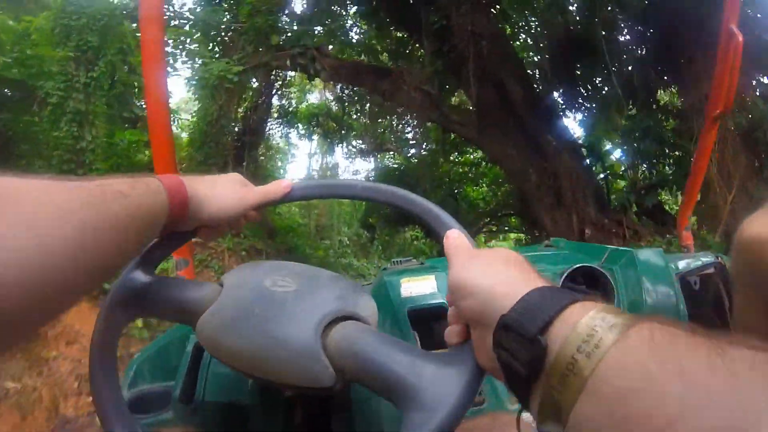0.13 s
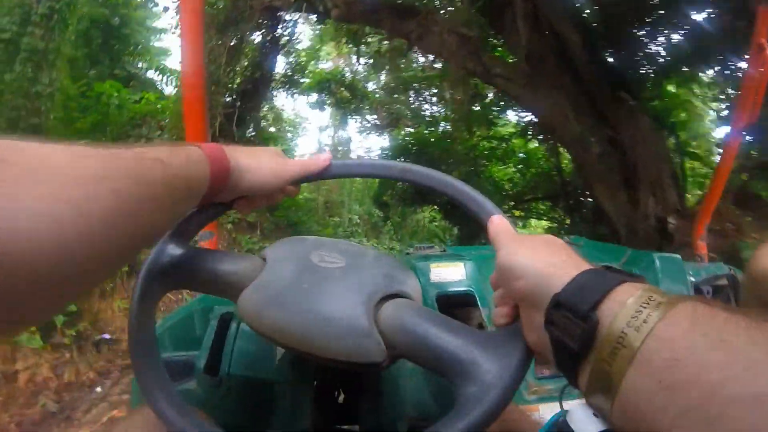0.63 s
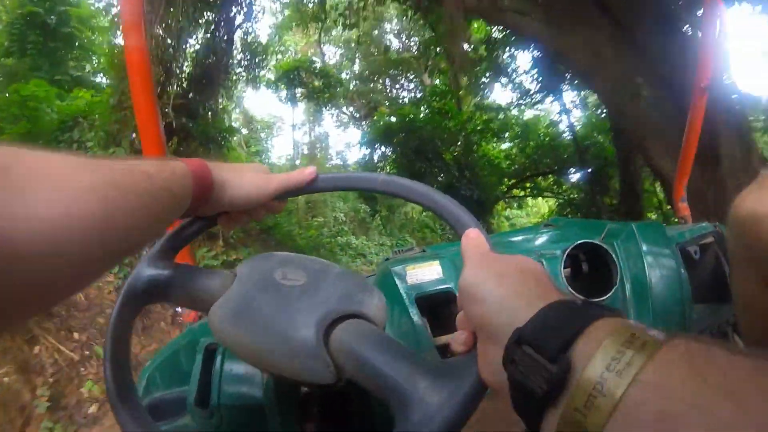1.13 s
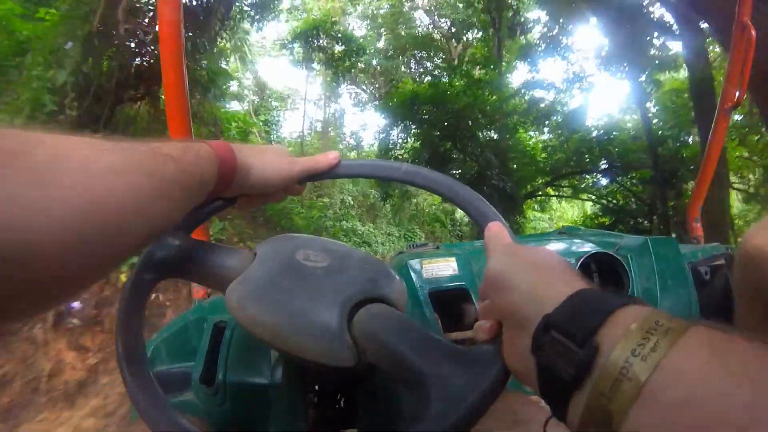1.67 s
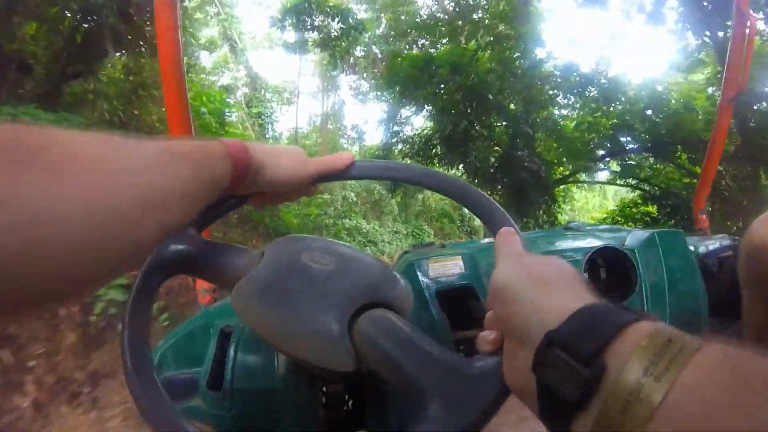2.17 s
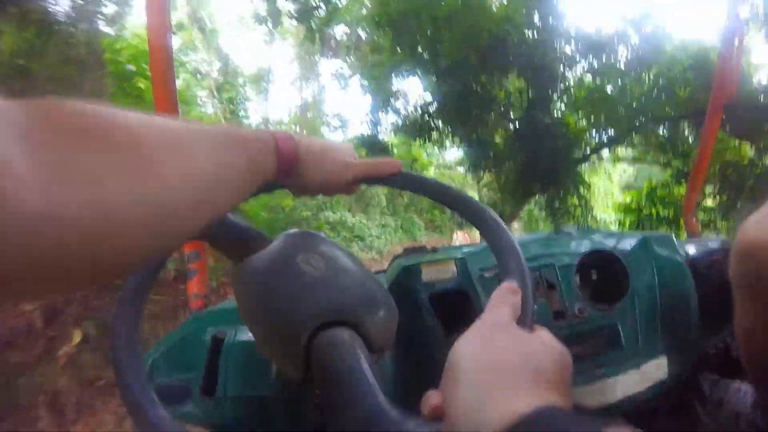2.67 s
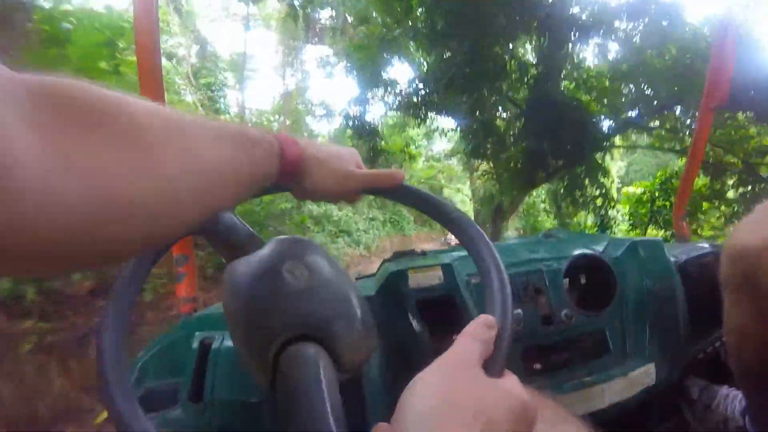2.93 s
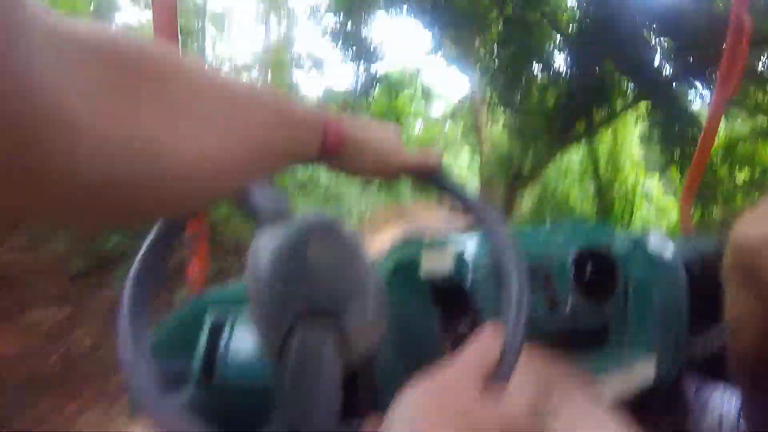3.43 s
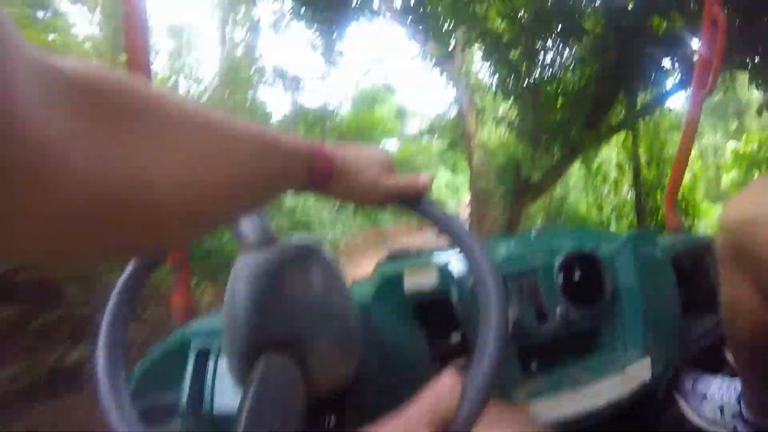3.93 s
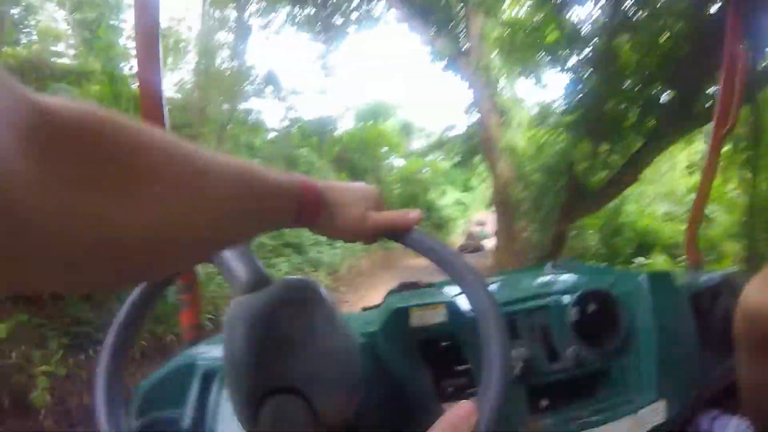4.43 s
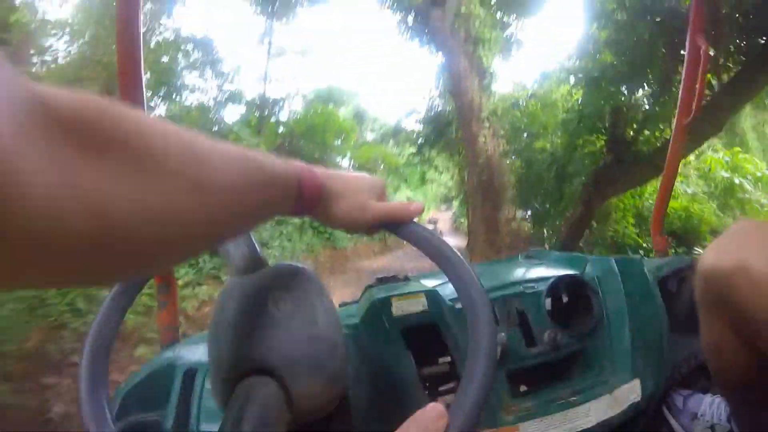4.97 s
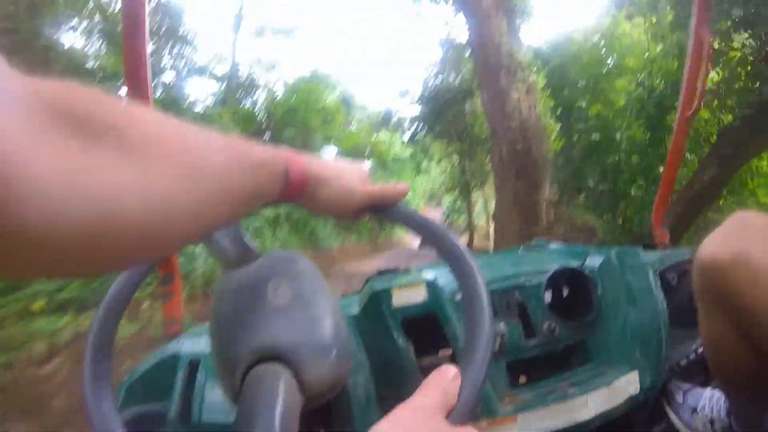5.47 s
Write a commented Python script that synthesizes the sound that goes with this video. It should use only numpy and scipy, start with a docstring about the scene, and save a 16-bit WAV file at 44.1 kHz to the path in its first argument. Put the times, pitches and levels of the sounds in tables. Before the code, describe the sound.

Inside a small open buggy on a rough forest track, a one-cylinder engine drones deep and boomy, climbs slightly, then drops abruptly around the middle to a slower, weaker, uneven chug. Low thumps jolt the microphone's case throughout, with short gritty scrapes from its mount, denser in the second half. A few hollow knocks of loose parts stand out after the drop. Close, muffled, body-worn microphone, outdoors with no echo.

```python
"""The one-cylinder engine of a small open buggy drones on a rough forest track and slows after a drop in revs.
Its drone is a stack of sine waves at multiples of the firing rate; its roar, growl and hiss are shaped noise.
A body-worn microphone in a muffling case hears it. Jolts thump the case as bursts of low noise, and its
mount scrapes as bursts of gritty noise. Loose parts knock as short rings, and a thin whistle is a sine wave.
"""
import sys
import numpy as np
from scipy import signal
from scipy.fft import rfft, irfft, next_fast_len
from scipy.io import wavfile
from scipy.ndimage import uniform_filter1d, map_coordinates

SR = 44100
rng = np.random.default_rng(int(sys.argv[2]) if len(sys.argv) > 2 else 0)


def file_out(sig):
    """Save sig as 16-bit WAV at sys.argv[1]."""
    # one column per channel
    cols = np.atleast_2d(sig).T
    # limit, then scale
    lim = np.clip(cols, -1, 1)
    pcm = np.round(lim * 32767).astype(np.int16)
    wavfile.write(sys.argv[1], SR, pcm)


def invert_db(x):
    """Field ratio 10**(x/20) for x, a level in decibels (scalar or array-like)."""
    u = np.asarray(x, float) / 20
    return 10 ** u


N = 246513  # length in samples


def along(points, hz):
    """Reads a curve of (Hz, value) points on a log frequency axis."""
    f, v = np.transpose(points)
    return np.interp(np.log(hz + 1), np.log(f + 1), v)


def curves(rows):
    """One value per sample for each column after the time."""
    s, *cols = np.transpose(rows)
    return [np.interp(np.arange(N) / SR, s, c) for c in cols]


def strokes(rows, rise_db_per_s, fall_db_per_s):
    """Gain of separate strokes: a steep rise, a sloping hold, a steep fall."""
    t = np.arange(N) / SR
    level_db = np.full(N, -120.)
    for s, held, start_db, end_db in rows:
        before_s = np.maximum(s - t, 0)
        after_s = np.maximum(t - s - held, 0)
        edge_db = rise_db_per_s * before_s + fall_db_per_s * after_s
        hold_db = np.interp(t, [s, s + held], [start_db, end_db])
        level_db = np.maximum(level_db, hold_db - edge_db)
    return invert_db(level_db)


def wobble(rate):
    """A smooth random curve through 'rate' random points a second."""
    points = rng.standard_normal(int(N * rate / SR) + 4)
    return map_coordinates(points, [np.arange(N) * rate / SR])


def coloured(x, spectrum, lo_hz, hi_hz):
    """Filters x through a spectrum, then scales it to rms 1 in the band lo-hi."""
    m = next_fast_len(N + 8192)
    hz = np.fft.rfftfreq(m, 1 / SR)
    z = rfft(x, m) * invert_db(along(spectrum, hz))
    band = irfft(z * ((hz > lo_hz) & (hz < hi_hz)), m)[:N]
    return irfft(z, m)[:N] / np.std(band)


# thin whistle: f/Hz, level/dB
WHISTLE_LINE = [(9651, -79)]


def whistle():
    """A thin sine line that wavers in level and phase."""
    (hz, db), = WHISTLE_LINE
    phase = 2 * np.pi * hz * np.arange(N) / SR + 1.1 * wobble(22)
    return invert_db(db + 2.1 * wobble(7.4)) * np.sin(phase)


# rings of knocking loose parts: t/s, level/dB (before the soft onset and decay), f/Hz, time to fall 60 dB/s
LOOSE_PARTS = [(1.08, -50, 6200, 0.081), (1.33, -53, 6210, 0.1), (1.4, -48, 6170, 0.1),
               (1.548, -51, 6200, 0.09), (2.07, -48, 6170, 0.15), (3.063, -16, 494, .05),
               (3.817, -27.5, 592, 0.092), (3.883, -35, 2300, 0.1), (3.887, -35, 1280, 0.1),
               (3.885, -34.5, 4500, 0.045), (3.99, -15.5, 428.5, 0.1), (4.735, -17.5, 1790, 0.045),
               (5.157, -40, 6236, 0.14)]


def knocks():
    """Each row is one short dying ring; the three near 3.885 s sound together as one knock."""
    out = np.zeros(N + SR)
    t = np.arange(SR // 4) / SR
    onset = 1 - np.exp(-t / 0.0036)
    for s, db, hz, t60 in LOOSE_PARTS:
        # the loose fit of the part roughens the ring: a random walk of the phase
        rattle = np.cumsum(rng.standard_normal(len(t))) * np.sqrt(hz) * 1.1e-3
        ring = np.sin(2 * np.pi * hz * t + rattle)
        out[round(s * SR):][:len(t)] += invert_db(db - 60 * t / t60) * onset * ring
    return out[:N]


# strokes of the scraping mount: start of full pressure t/s, held/s, level/dB at start, level/dB at end
MOUNT_STROKES = [(0.1, 0.019, -37.5, -40.5), (0.166, 0.12, -40.5, -38.5), (0.405, 0.07, -45, -46.5),
                 (0.51, 0.046, -48.5, -52.5), (0.583, 0.14, -49, -37.5), (0.68, .07, -45, -44),
                 (0.855, 0.1, -51, -54), (0.97, 0.087, -41.5, -51.5), (1.5, .07, -48.5, -50.5),
                 (1.845, 0.037, -50.5, -46.5), (1.935, .03, -54, -56), (2.035, 0.031, -54, -54.5),
                 (2.12, .025, -49, -53), (2.375, 0.012, -49, -44), (2.5, 0.075, -51, -41),
                 (2.575, 0.036, -41, -47.5), (2.66, 0.04, -46, -44.5), (3.064, .008, -51, -47),
                 (3.205, .03, -48, -52), (3.345, 0.054, -42, -44), (3.468, 0.034, -52, -35),
                 (3.535, 0.038, -43.5, -41.5), (3.605, 0.095, -39.5, -47.5), (3.77, 0.077, -48, -40.5),
                 (3.885, 0.033, -36.5, -52), (3.948, 0.023, -39, -33), (4.005, 0.074, -46, -48.5),
                 (4.135, .17, -49.5, -48.5), (4.326, 0.018, -34.5, -37), (4.41, 0.028, -46.5, -47.5),
                 (4.452, .02, -49, -46), (4.49, 0.033, -47.5, -34.5), (4.562, .03, -48, -53),
                 (4.6, 0.1, -46, -39), (4.733, 0.02, -37, -37.5), (4.795, 0.041, -40, -35.5),
                 (4.85, 0.077, -46, -54.5), (5.008, 0.044, -43, -47.5), (5.15, 0.029, -50, -49),
                 (5.225, 0.019, -45, -36), (5.26, 0.044, -38, -47), (5.316, 0.078, -46, -38.5)]
# colour of the rubbing, with the case's resonances: f/Hz, relative level/dB (per Hz)
RUB_COLOUR = [(900, -17), (1200, -8.5), (1470, -14), (1680, -0.5), (1950, -7), (3300, -7), (4300, -15),
              (5030, -11.5), (5540, -20.5), (6100, -17), (7600, -23), (8300, -33.5), (9600, -29),
              (11300, -47.5), (12500, -34.5), (15500, -61)]


def scrape():
    """Stick-slip grit of the mount, ringing the case's resonances."""
    grit = invert_db(1.0 * wobble(70) + 3 * wobble(700)) * rng.standard_normal(N)
    pressure = strokes(MOUNT_STROKES, rise_db_per_s=898, fall_db_per_s=903)
    return pressure * coloured(grit, RUB_COLOUR, 1600, 3390)


# jolts into the case: start of full push t/s, held/s, level/dB at start, level/dB at end
# (gains on the evened-out noise)
CASE_JOLTS = [(0.093, 0.045, -13, -20), (0.229, 0.0056, -20, -13.5), (0.646, 0.097, -12, -12.5),
              (0.967, 0.042, -11.5, -11.5), (1.512, .03, -13.5, -16.5), (1.82, 0.024, -31, -26),
              (2.172, 0.11, -19, -27), (2.378, 0.024, -11, -17.5), (2.579, 0.0097, -4, -10),
              (2.717, 0.011, -11, -16), (3.225, 0.024, -18.5, -17), (3.35, 0.027, -8, -17.5),
              (3.501, .01, -7, -8.5), (3.65, 0.057, -10, -13.5), (3.79, .01, -20, -11.5),
              (3.99, 0.019, -20, -19), (4.15, 0.0093, -25, -24), (4.27, 0.11, -22, -21.5),
              (4.401, 0.14, -18, -16.5), (4.664, 0.068, -9.5, -19), (4.83, 0.051, -14, -8.5),
              (5.026, 0.032, -15, -18), (5.17, 0.0094, -27, -20.5), (5.25, 0.066, -19, -21.5),
              (5.405, .01, -26, -14.5)]
# colour of the thuds: f/Hz, relative level/dB (per Hz)
THUD_COLOUR = [(8, -9), (22, 11), (40, 8.5), (60, -6.5), (90, -2.5), (200, -31.5), (400, -52), (1500, -120)]


def jolts():
    """Low shoves of the whole case; a faint road rumble stays between them."""
    shove = coloured(rng.standard_normal(N), THUD_COLOUR, 20, 65)
    # each shove is a firm push, so the swing is evened out
    shove = shove / np.sqrt(uniform_filter1d(shove ** 2, SR // 25) + 0.049)
    push = strokes(CASE_JOLTS, rise_db_per_s=447.5, fall_db_per_s=401.5)
    rumble = invert_db(-38 + 3 * wobble(4))
    return (push + rumble) * shove


# brief gain changes of engine and whistle: two clear dips, one slight, one of 0 dB that stays level
# from t/s, to t/s, level/dB (before the edges are smoothed)
GAIN_CHANGES = [(3.513, 3.534, -13), (3.72, 3.766, -9.5), (4.941, 5.001, 0), (5.087, 5.147, -1)]


def gain_changes():
    """A gain with two clear brief dips, a slight one and a 0 dB stretch that stays level; smoothed edges."""
    t = np.arange(N) / SR
    db = sum(change_db * ((t > start) & (t < end)) for start, end, change_db in GAIN_CHANGES)
    return invert_db(uniform_filter1d(db, SR // 150))


# clatter: t/s, valve gear hiss level/dB, gearbox growl level/dB
CLATTER_LEVELS = [(0, -56.5, -55.5), (0.9, -58, -58.5), (1.5, -52.5, -53.5), (2.3, -55.5, -54.5),
                  (2.75, -58.5, -58.5), (3.25, -52.5, -53), (3.75, -53, -57.5), (3.87, -48, -48.5),
                  (4.05, -52.5, -54), (4.27, -50.5, -47.5), (4.45, -52.5, -55.5), (4.58, -44.5, -41),
                  (4.7, -45, -42.5), (4.98, -54, -57), (5.18, -51.5, -55.5), (5.43, -48.5, -46),
                  (5.59, -48.5, -48.5)]
# colour of the gearbox growl: f/Hz, relative level/dB (per Hz)
GROWL_COLOUR = [(500, -28.5), (750, -4), (900, -7.5), (1050, -7.5), (1260, -2), (1450, -10.5), (1900, -48)]
# colour of the valve gear hiss: f/Hz, relative level/dB (per Hz)
HISS_COLOUR = [(1200, -22.5), (1600, -9), (2400, -9.5), (2750, -7.5), (3500, -10.5), (4100, -5.5),
               (5100, -6.5), (5700, -15), (6300, -18), (7000, -24.5), (9600, -31), (11500, -55.5),
               (14000, -60.5), (17000, -120)]


def clatter(phase, firing):
    """Gearbox growl and valve gear hiss: noise that swells once per firing."""
    hiss_db, growl_db = curves(CLATTER_LEVELS)
    rough = firing * invert_db(1.4 * wobble(25)) * rng.standard_normal(N)
    growl = coloured(rough, GROWL_COLOUR, 1000, 1450)
    fizz = (1 + .15 * np.cos(phase)) * invert_db(1.5 * wobble(40)) * rng.standard_normal(N)
    hiss = coloured(fizz, HISS_COLOUR, 3800, 5600)
    return invert_db(growl_db) * growl + invert_db(hiss_db) * hiss


# colour of the combustion roar: f/Hz, relative level/dB (per Hz)
ROAR_COLOUR = [(50, -18), (110, -11.5), (150, -12.5), (190, -12.5), (250, -16), (330, -15), (400, -19.5),
               (480, -20), (700, -29.5), (900, -45.5), (1500, -79.5)]


def roar(firing):
    """Combustion noise that swells once per firing."""
    burn = firing * invert_db(.5 * wobble(30)) * rng.standard_normal(N)
    return coloured(burn, ROAR_COLOUR, 250, 750)


# brief swells at three times the firing rate: t/s, peak level/dB
BOOM_SWELLS = [(3.135, -18), (3.225, -14.5), (3.355, -13.5)]


def boom(phase):
    """An added sine at three times the firing rate swells briefly, in bell-shaped bursts."""
    t = np.arange(N) / SR
    width_s = 0.017
    swell = sum(invert_db(db) * np.exp(-.5 * ((t - s) / width_s) ** 2) for s, db in BOOM_SWELLS)
    return swell * np.sin(3 * phase + .4 * 3 * 3)


# exhaust pipe as heard through the case: f/Hz, relative level/dB
EXHAUST_PIPE = [(35, -41), (65, -6.5), (85, 1), (105, 4), (125, 3), (145, -5.5), (175, -16.5), (225, -14.5),
                (280, -21), (330, -19), (400, -39), (480, -24.5), (650, -42), (900, -51)]


def drone(phase, hz):
    """Sines at whole multiples (orders) of the firing rate, weighted by the exhaust pipe."""
    orders = np.arange(1, 17)
    gains = np.array([invert_db(along(EXHAUST_PIPE, k * hz)) for k in orders])
    total = 0
    for k, gain in zip(orders, gains):
        # higher orders flutter more; the pipe spreads their phases
        flutter = invert_db(.16 * k * wobble(6))
        total = total + gain * flutter * np.sin(k * phase + .4 * k * k + .03 * k * wobble(8))
    # the rms of orders 2 to 4, before flutter, sets the level
    return total / np.sqrt(np.sum(gains[1:4] ** 2, axis=0) / 2)


# engine speed: t/s, firing rate f/Hz
FIRING_RATE = [(0, 42.8), (0.38, 39.74), (0.6, 41.6), (0.8, 41.58), (1.2, 45.11), (1.77, 48.52),
               (2.12, 43.76), (2.7, 43.54), (2.95, 41.93), (3.02, 33.95), (3.14, 35.52), (3.45, 34.23),
               (4.0, 32.66), (4.6, 33.21), (5.25, 33.62), (5.49, 35.12)]
# engine load: t/s, drone level/dB, roar level/dB
ENGINE_LOAD = [(0, -14, -37.5), (0.35, -20.5, -37), (0.6, -15.5, -36.5), (0.8, -20.5, -35.5),
               (1.2, -17, -36), (1.53, -15.5, -32), (1.83, -15.5, -30.5), (2.16, -17, -33),
               (2.56, -18.5, -33.5), (2.7, -22, -38.5), (3.05, -23, -35), (3.6, -27, -36.5),
               (3.78, -31.5, -42), (3.9, -27.5, -33), (4.1, -26, -38), (4.5, -22, -33.5), (4.62, -25, -26),
               (4.82, -19, -34), (4.96, -27, -37.5), (5.25, -25, -32.5), (5.59, -17.5, -29.5)]
# how unevenly the cylinder fires: t/s, scatter of the drone level/dB
UNEVEN_FIRING = [(0, 1.1), (2, .8), (2.9, 1.8), (3.3, 3.3), (3.8, 3.5), (4.1, 2), (5.59, 1.8)]


def engine():
    """One cylinder: its firing phase drives the drone and boom, and pulses the roar, growl and hiss."""
    hz, = curves(FIRING_RATE)
    drone_db, roar_db = curves(ENGINE_LOAD)
    scatter_db, = curves(UNEVEN_FIRING)
    phase = 2 * np.pi * np.cumsum(hz * (1 + .002 * wobble(25))) / SR
    firing = 1 + .25 * np.cos(phase + 1.3)
    uneven_db = scatter_db * wobble(21.966)
    tones = boom(phase) + invert_db(drone_db + uneven_db) * drone(phase, hz)
    return tones + invert_db(roar_db) * roar(firing) + clatter(phase, firing)


def scene():
    """All sources at one microphone."""
    return (gain_changes() * (engine() + whistle()) + scrape() + jolts() + knocks())[None]


def low_pass(x):
    """Removes everything above the highest recorded frequency."""
    return signal.sosfilt(signal.butter(12, 15700, fs=SR, output="sos"), x)


def record(dry):
    """The largest swings are softly rounded towards a ceiling of 0.75."""
    mix = dry / (1 + np.abs(dry / .75) ** 4.5) ** (1 / 4.5)
    return low_pass(mix)


dry = scene()
out = record(dry)
file_out(out)
```